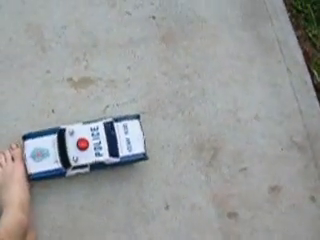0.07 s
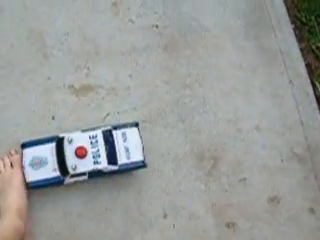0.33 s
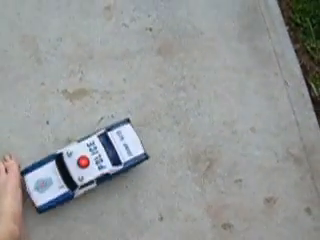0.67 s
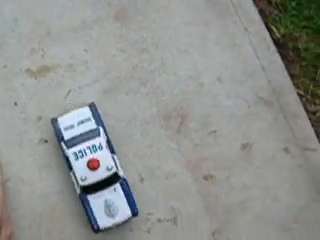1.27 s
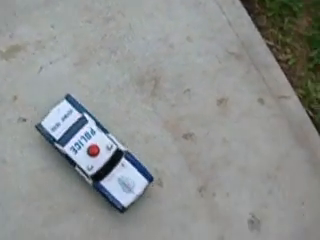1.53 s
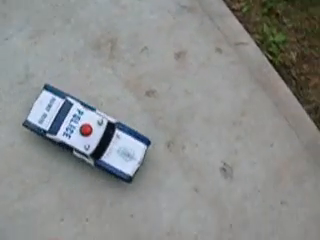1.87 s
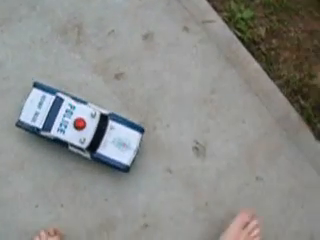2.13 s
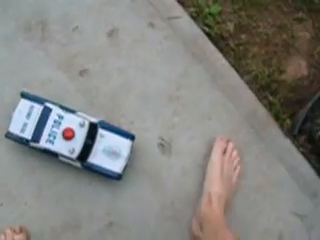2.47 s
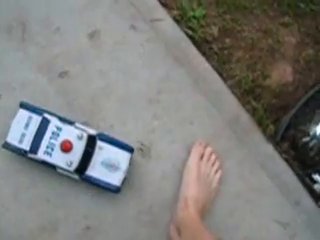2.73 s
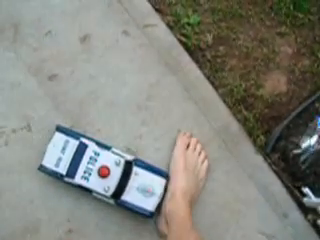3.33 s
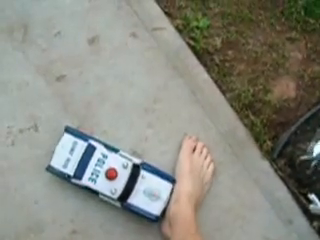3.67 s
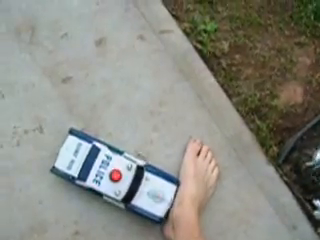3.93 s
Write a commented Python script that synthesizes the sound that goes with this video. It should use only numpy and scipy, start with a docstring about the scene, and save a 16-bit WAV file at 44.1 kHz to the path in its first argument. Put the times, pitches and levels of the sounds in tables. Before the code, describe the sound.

A tin toy car buzzes and rattles close by for all four seconds, its motor whine wavering. The wheels scrub on concrete until about 1.2 seconds, and irregular knocks on grit begin at 0.5. An axle squeaks at 1.5 and more faintly at 3.1. The drive grates briefly near 1.4 and again from 3.3 to the end. Faint outdoor rumble and machine hum lie behind; the sound is slightly dull.

```python
"""A battery-driven tin toy car circling on a concrete path, close to the microphone.
Its motor and pinion buzz, loose panels rattle in step with a gear wheel, the wheels knock over grit
and scrub in the turn, an axle squeaks, and the drive grates when the car is held against a foot.
Far behind lie outdoor rumble and a faint machine hum. The recorder is dull and clips the peaks."""
import sys
import numpy as np
from scipy import signal
from scipy.fft import rfft, irfft
from scipy.io import wavfile
from scipy.ndimage import uniform_filter1d, minimum_filter1d

SR = 44100
rng = np.random.default_rng(int(sys.argv[2]) if len(sys.argv) > 2 else 0)


def dump(signal):
    """Clip the signal to [-1, 1] and save it as 16-bit WAV at the path in sys.argv[1]."""
    limited = np.clip(np.atleast_2d(signal).T, -1, 1)
    pcm = np.round(limited * 32767).astype(np.int16)
    wavfile.write(sys.argv[1], SR, pcm)


N = 176400

# modes of the tin shell: pitch_hz, width_hz, gain_db
SHELL_MODES = [(379.5, 10, -11.5), (559, 12.8, -1.5), (625.8, 8, -1), (750.3, 51.6, 5.5), (806.7, 45, -2.5),
               (945, 47.6, -3), (1120, 40, -2.5), (1306, 84, -12), (1743, 70, -10)]
# dead clack of a contact on the shell: frequency_hz, gain_db
CLACK_SPECTRUM = [(30, -43), (100, -26.5), (220, -24), (330, -15), (460, -10.5), (600, 1.5), (760, -5),
                  (1000, -3), (1400, -19), (2000, -26), (3100, -19), (3700, -38), (5000, -48.5)]
# tick of the small parts: frequency_hz, gain_db
TICK_SPECTRUM = [(100, -35.5), (600, -17.5), (1100, -11), (1500, -6), (2050, -6), (2600, -4), (3150, -4.5),
                 (3400, -18), (3700, -27.5), (4200, -34.5), (4700, -29), (6000, -17)]


def undb(db):
    return 10 ** (np.asarray(db) / 20)


def unit(x):
    """Scale to rms 1."""
    return x / np.sqrt(np.mean(x ** 2))


def curve(table, column=1):
    """One column of a table, joined by straight lines in time."""
    rows = np.array(table)
    return np.interp(np.arange(N) / SR, rows[:, 0], rows[:, column])


def drift(rate_hz):
    """Smooth random wander with rms 1."""
    step = max(int(SR / rate_hz), 1)
    held = rng.standard_normal(2048)[np.arange(N) // step % 2048]
    return unit(uniform_filter1d(uniform_filter1d(held, step), step))


def ring(x, modes):
    """Resonances side by side, with alternating sign."""
    return sum((-1) ** k * undb(db) * signal.lfilter(*signal.iirpeak(hz, hz / width, SR), x)
               for k, (hz, width, db) in enumerate(modes))


def colour(x, spectrum, size=4096):
    """Minimum-phase filter through points of frequency_hz, gain_db."""
    hz, db = np.array(spectrum).T
    bins_hz = np.fft.rfftfreq(size, 1 / SR)
    gain = undb(np.interp(np.log(bins_hz + 1), np.log(hz), db))
    cepstrum = irfft(np.log(gain))
    cepstrum[1:size // 2] *= 2
    cepstrum[size // 2 + 1:] = 0
    return signal.fftconvolve(x, irfft(np.exp(rfft(cepstrum))))[:N]


def contacts(per_s, scatter_db):
    """Random taps of either sign and uneven size."""
    chance, size, side = rng.random(N), rng.standard_normal(N), rng.random(N)
    return (chance < per_s / SR) * undb(scatter_db * np.clip(size, -2, 2)) * np.sign(side - .5)


def gear_throb(depth_db, gear_hz=30):
    """One swell per turn of a slightly unsteady gear wheel."""
    turns = np.cumsum(gear_hz * (1 + .004 * drift(4))) / SR
    return undb(depth_db * np.cos(2 * np.pi * turns + 2))


def outdoors():
    """Low rumble and a distant machine whose hum lines emerge one after another."""
    # open-air background: frequency_hz, gain_db
    air_spectrum = [(20, -35.5), (45, -11), (65, 3.5), (90, -3), (130, -5.5), (250, 4.5), (600, -15.5),
                    (4000, -31.5)]
    # lines of the hum: pitch_hz, full_level_db, full_at_s
    hum_lines = [(64, -55, .5), (112.5, -48, 0.45), (168.3, -39.5, 2.7), (272.8, -34.5, 3.8),
                 (379.5, -39, 3.7)]
    t = np.arange(N) / SR
    rise_db_per_s = 15
    hum = sum(undb(db + rise_db_per_s * np.minimum(t - full_s, 0) + drift(5)) * np.sin(2 * np.pi * hz * t)
              for hz, db, full_s in hum_lines)
    return undb(-44) * unit(colour(rng.standard_normal(N), air_spectrum)) + hum


def axle_squeaks():
    """A dry axle sings briefly on one wavering note."""
    # squeaks: centre_s, length_s, pitch_hz, level_db
    squeaks = [(1.49, 0.29, 1122, -16.5), (3.139, .18, 940, -27.5)]
    t = np.arange(N) / SR
    waver, roughness = .005 * drift(40), undb(2.5 * drift(90))
    sound = np.zeros(N)
    for centre_s, length_s, hz, db in squeaks:
        swell = np.cos(np.pi * np.clip((t - centre_s) / length_s, -.5, .5)) ** 2
        cycles = np.cumsum(hz * (1 + waver)) / SR
        sound += undb(db) * roughness * swell * np.sin(2 * np.pi * cycles)
    return sound


def drive_grating():
    """The drive slips and grates while the car is blocked or under load."""
    # modes of the drive: pitch_hz, width_hz, gain_db
    drive_modes = [(2384, 45, 7.5), (2566, 37, -2), (2644, 79, 1.5), (2750, 40, -7.5), (2830, 60, -4),
                   (2930, 150, -8)]
    # strength of the grating: time_s, level_db
    grate_levels = [(0, -25), (.2, -33.5), (.3, -42.5), (1.3, -42), (1.42, -21), (1.55, -40.5),
                    (3.15, -47.5), (3.3, -27.5), (3.5, -28.5), (3.56, -19.5), (3.65, -18), (3.78, -27),
                    (3.85, -17.5), (4, -24.5)]
    slips = contacts(per_s=1100, scatter_db=4) * gear_throb(depth_db=3)
    return unit(colour(ring(slips, drive_modes), TICK_SPECTRUM)) * undb(curve(grate_levels))


def wheel_scrub():
    """The wheels stick and slip sideways over the concrete, hiss and set the chassis singing."""
    # modes of the chassis: pitch_hz, width_hz, gain_db
    chassis_modes = [(1196, 21, -4), (1318, 28, -4), (1644, 23, -3), (1697, 28, -2.5), (2456, 30, -11),
                     (2866, 33, -9), (2935, 16, -8.5), (3325, 18, -6.5), (4485, 18, -19)]
    # hiss of the wheels: frequency_hz, gain_db
    grit_spectrum = [(300, -28.5), (1500, -5), (3000, 0), (3450, -3), (3800, -7.5), (4400, -17),
                     (5000, -19.5)]
    # scrubbing as the car pivots: time_s, level_db
    scrub_levels = [(0, -28.5), (.3, -26.5), (.48, -24), (.68, -22.5), (.75, -29), (.82, -20.5),
                    (1.05, -20), (1.25, -38.5), (1.4, -39), (4, -40.5)]
    sing_spectrum = [(400, -19.5), (1100, 3.5), (3400, 8.5), (3900, -5), (4500, -2)]
    slips = contacts(per_s=2500, scatter_db=1.5)
    sing = unit(colour(ring(slips, chassis_modes), sing_spectrum))
    hiss = undb(-6.5) * unit(colour(slips, grit_spectrum))
    return (sing + hiss) * undb(curve(scrub_levels))


def wheel_knocks():
    """A wheel drops off a grain of grit: the shell is struck and bounces once."""
    # blows on the shell: start_s, strength_db
    knocks = [(0.51, 6.5), (0.569, 12), (0.582, -9), (0.787, 3.5), (0.843, 4), (0.906, 4), (1.05, 9.5),
              (1.174, 6), (1.505, 3.5), (1.569, 5.5), (1.682, 3), (1.75, 3.5), (2.011, 1.5), (2.081, 2),
              (2.113, -6.5), (2.586, -1.5), (2.75, 6), (2.926, 7), (3.116, 3.5), (3.149, 2), (3.182, 9),
              (3.491, 4), (3.595, 2), (3.619, 7), (3.704, 4), (3.766, 3), (3.842, 3.5), (3.879, -11.5),
              (3.921, -1)]
    # softness of a wheel's knock: frequency_hz, gain_db
    thud_spectrum = [(200, -10.5), (450, 1), (850, -1), (1300, -9), (2500, 0), (4000, -12.5)]
    bounces_s, bounce_db = .0042 * rng.uniform(.6, 1.2, len(knocks)), -8
    blows = np.zeros(N)
    for (start_s, db), bounce_s in zip(knocks, bounces_s):
        blows[int(start_s * SR)] += undb(db)
        blows[int((start_s + bounce_s) * SR)] += undb(db + bounce_db)
    shell = undb(31.5) * ring(blows, SHELL_MODES)
    clack = undb(27) * colour(blows, CLACK_SPECTRUM)
    return colour(shell + clack, thud_spectrum)


def tin_rattle():
    """The shell, its flat panels and its small loose parts chatter against the chassis."""
    # strength of the rattle: time_s, shell_db, parts_db
    rattle_levels = [(0.0, -19, -19.5), (0.19, -16.5, -21.5), (0.28, -20, -24.5), (0.7, -15.5, -18),
                     (0.73, -26, -24), (0.8, -23.5, -23.5), (1.19, -14.5, -20.5), (1.36, -20.5, -24.5),
                     (1.39, -21.5, -18.5), (1.61, -14.5, -22.5), (1.71, -19.5, -20), (1.76, -16, -22),
                     (1.86, -20.5, -22), (2.12, -15, -21.5), (2.21, -22.5, -23), (2.39, -16.5, -19.5),
                     (2.45, -22, -26), (2.67, -15.5, -18), (2.7, -19.5, -21), (2.75, -12, -21),
                     (2.81, -22.5, -33), (2.91, -15.5, -18), (2.93, -11, -21.5), (3.02, -18.5, -22.5),
                     (3.11, -16.5, -22.5), (3.48, -19.5, -22), (3.51, -14.5, -20.5), (3.55, -15.5, -18),
                     (3.62, -15.5, -17.5), (3.75, -16, -19), (3.79, -16.5, -25.5), (3.81, -32.5, -13.5),
                     (3.84, -11.5, -18.5), (4.0, -18, -19.5)]
    # clatter of the panels: time_s, level_db
    panel_levels = [(0.0, -27), (0.08, -20), (1.31, -26), (1.39, -20), (2.44, -24.5), (3.27, -20),
                    (3.45, -23), (3.59, -20), (4.0, -20.5)]
    # tone of the panels: frequency_hz, gain_db
    panel_spectrum = [(300, -30.5), (700, -10), (950, 0.5), (1150, -2.5), (1330, 1.5), (1520, -3.5),
                      (1770, -4.5), (1950, -8.5), (2600, -19.5), (4500, -43.5)]
    # modes of the loose parts: pitch_hz, width_hz, gain_db
    part_modes = [(1790, 100, -4), (2356, 62, 8.5), (2700, 43, -12.5), (2963, 155, 17), (3340, 150, -5.5),
                  (4630, 150, -25)]
    throb = gear_throb(depth_db=2.4)
    heavy_taps = unit(contacts(per_s=1300 * throb, scatter_db=1.84)) * undb(.96 * drift(60))
    light_taps = unit(contacts(per_s=1900, scatter_db=2)) * throb
    shake = light_taps + .35 * heavy_taps  # the shell's taps also shake panels and parts
    shell = undb(-3) * unit(ring(heavy_taps, SHELL_MODES))
    clack = undb(2.5) * unit(colour(heavy_taps, CLACK_SPECTRUM))
    panels = undb(-1) * unit(colour(shake, panel_spectrum))
    parts = undb(-2.5) * unit(colour(ring(shake, part_modes), TICK_SPECTRUM))
    ticks = undb(1) * unit(colour(shake, TICK_SPECTRUM))
    return ((shell + clack) * undb(curve(rattle_levels))
            + panels * undb(curve(panel_levels))
            + (parts + ticks) * undb(curve(rattle_levels, column=2)))


def motor():
    """Each shaft turn kicks the gearbox and scrapes the teeth; the pinion whines around its tooth rate."""
    # motor speed: time_s, turns_per_s
    shaft_speed = [(0, 105), (.52, 88.6), (.7, 90.5), (.92, 89), (1.04, 98.4), (1.2, 96), (1.35, 88),
                   (1.52, 95), (1.65, 90), (2.3, 88), (2.76, 99), (3.3, 78.7), (3.7, 90.6), (4, 91)]
    # modes of the gearbox frame: pitch_hz, width_hz, gain_db
    frame_modes = [(633.5, 19, -2), (749.6, 81, 5), (799, 45, -3.5), (1228, 43, -9.5), (1685, 29, -5.5),
                   (2270, 69, -15.5), (2797, 230, -20.5), (3307, 20, -20), (4370, 31, -37)]
    # gear buzz: time_s, level_db
    buzz_levels = [(0, -25), (.35, -25.5), (.52, -14.5), (.75, -13.5), (1.1, -20), (1.3, -15.5),
                   (1.5, -18.5), (1.7, -18.5), (2.5, -22.5), (2.74, -13), (2.82, -19), (3.6, -20.5),
                   (4, -18.5)]
    # partials of the whine: shaft_multiple, gain_db
    mesh_partials = [(7, -10), (8, 0), (9, -16)]
    # pinion whine: time_s, level_db
    whine_levels = [(0, -18.5), (.42, -23), (.505, -24), (.515, -12), (.62, -21), (.75, -26), (.9, -14.5),
                    (1.06, -10.5), (1.2, -15.5), (1.3, -28), (1.42, -15), (1.53, -10), (1.68, -32.5),
                    (2.55, -36), (2.75, -16), (2.82, -28), (3.75, -33.5), (3.92, -15), (4, -14)]
    buzz_spectrum = [(250, -6), (550, 3), (3350, 2.5), (3800, -16), (4500, -5.5)]
    turns = np.cumsum(curve(shaft_speed) * (1 + .0087 * drift(35))) / SR
    kicks = np.diff(np.floor(turns), prepend=0) * undb(2.9 * rng.standard_normal(N))
    scrape = np.exp(-(turns % 1) / .33) * rng.standard_normal(N)
    frame = ring(unit(kicks) + .72 * unit(scrape), frame_modes)
    buzz = unit(colour(frame, buzz_spectrum))
    backlash = .08 * drift(90)  # play between the teeth jitters the phase
    whine = unit(sum(undb(db + 2.5 * drift(45)) * np.sin(2 * np.pi * (multiple * turns + backlash))
                     for multiple, db in mesh_partials))
    return buzz * undb(curve(buzz_levels)) + whine * undb(curve(whine_levels))


def scene():
    """The car close up and the outdoors behind it, on one microphone."""
    car = motor() + tin_rattle() + wheel_knocks() + axle_squeaks() + wheel_scrub() + drive_grating()
    return (car + outdoors())[None]


def record(dry):
    """A narrow-band recorder with a quick limiter; its off-centre converter clips and hisses faintly."""
    band_hz, top_hz = 4720, 15800
    threshold, slope, hold = .8, .6, int(.002 * SR)
    offset, full_scale = -.0765, .98
    dull = signal.sosfilt(signal.cheby1(14, .3, band_hz, fs=SR, output="sos"), dry)
    needed_gain = threshold / np.maximum(np.abs(dull), threshold)
    gain = uniform_filter1d(minimum_filter1d(needed_gain, hold), hold) ** slope
    clipped = np.clip(dull * gain + offset, -full_scale, full_scale)
    hiss = undb(-84) * rng.standard_normal(N)
    return signal.sosfilt(signal.ellip(8, .2, 70, top_hz, fs=SR, output="sos"), clipped + hiss)


dry = scene()
out = record(dry)
dump(out)
```